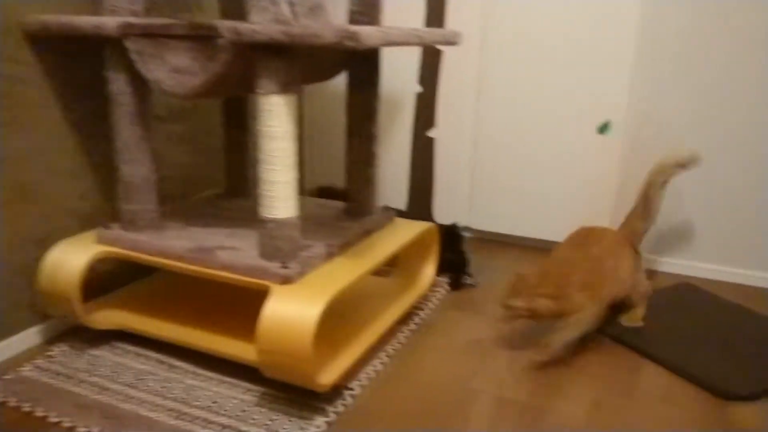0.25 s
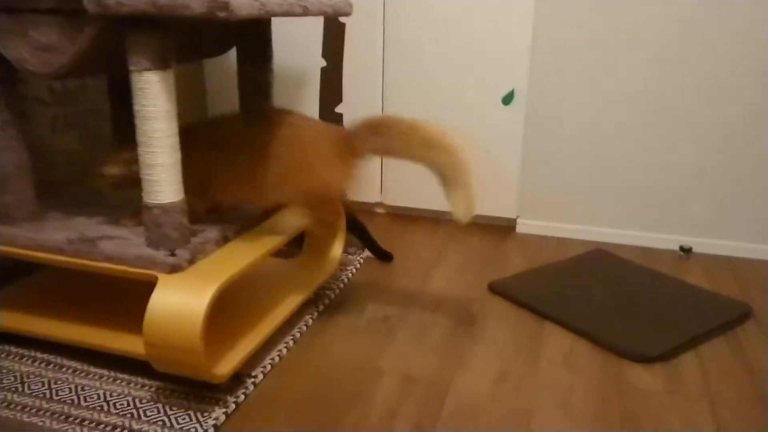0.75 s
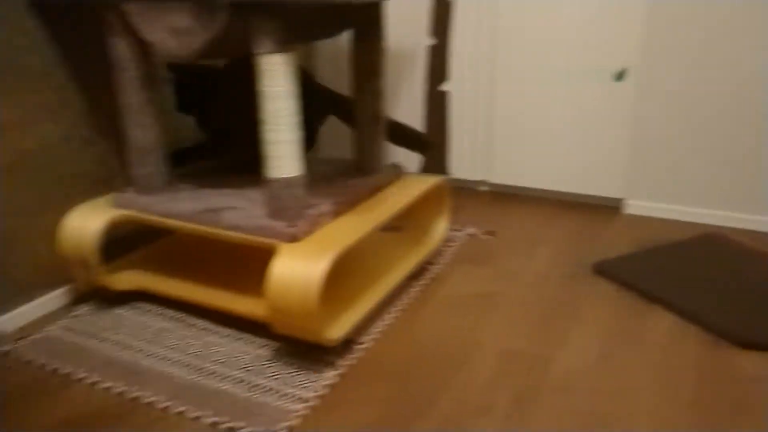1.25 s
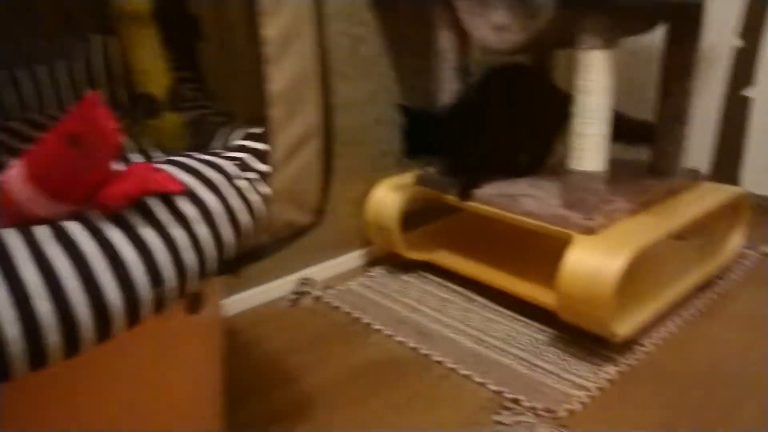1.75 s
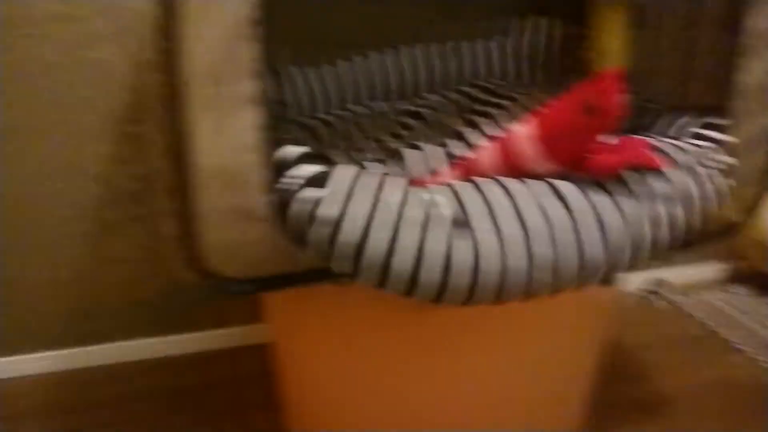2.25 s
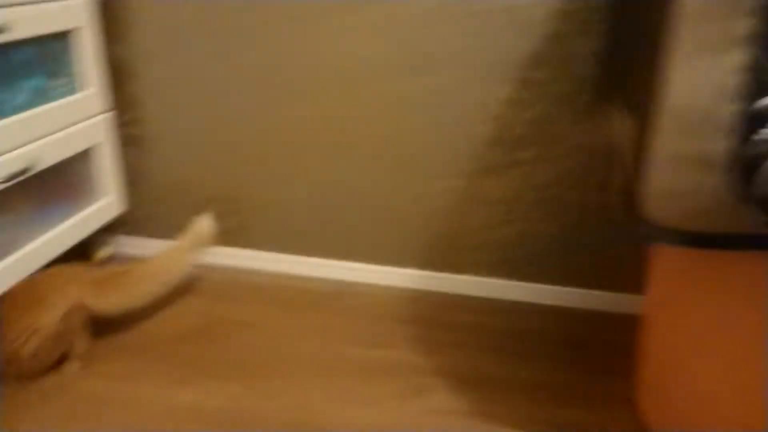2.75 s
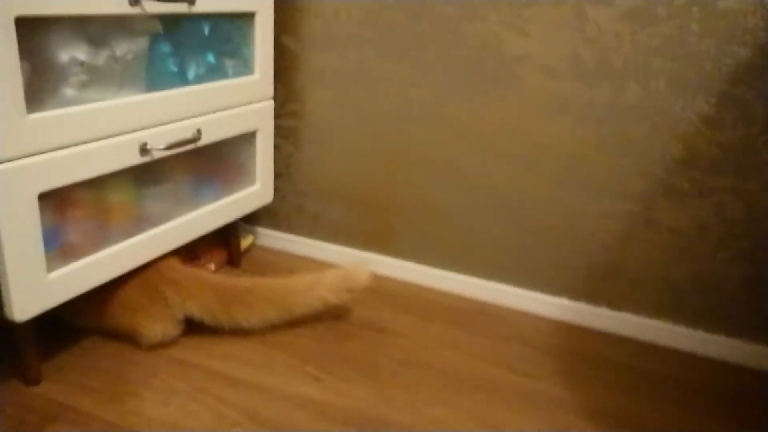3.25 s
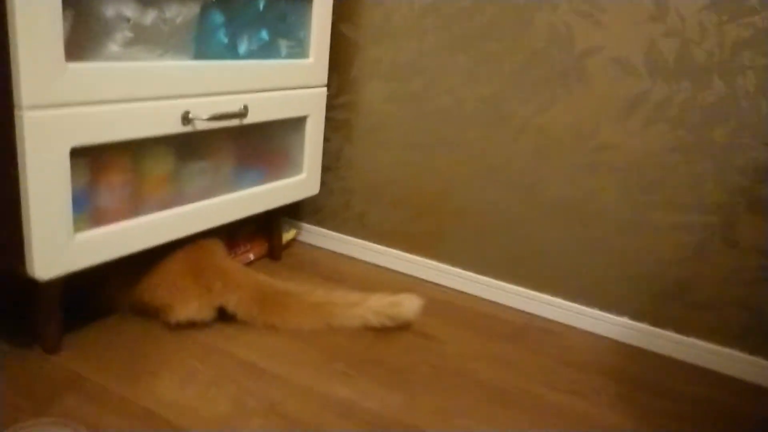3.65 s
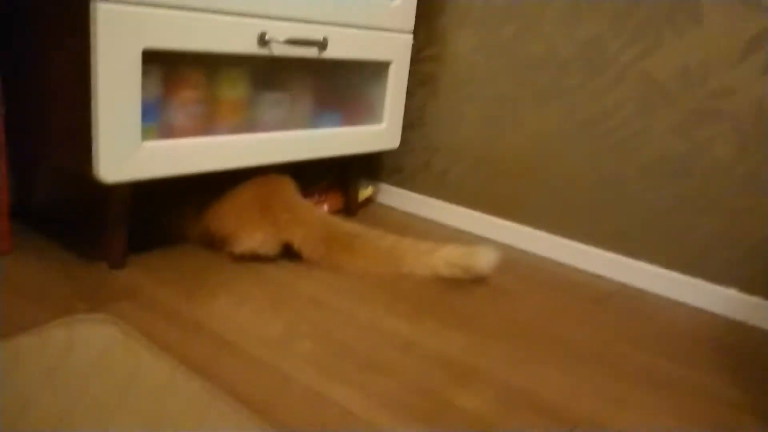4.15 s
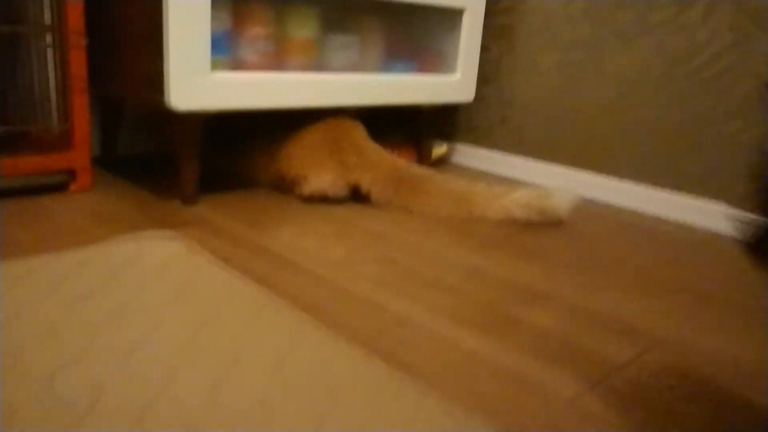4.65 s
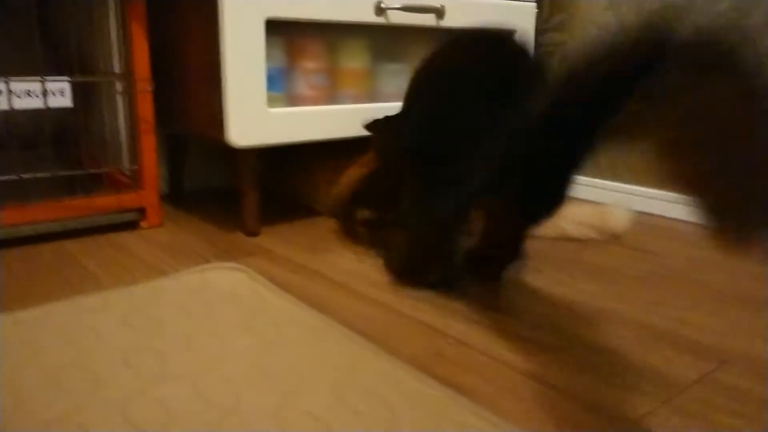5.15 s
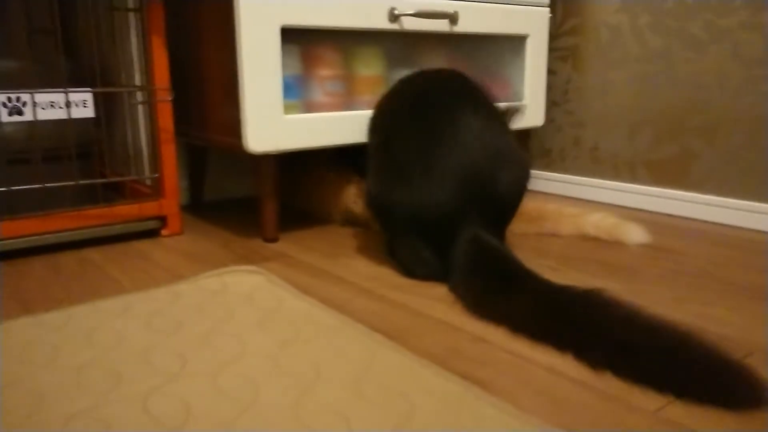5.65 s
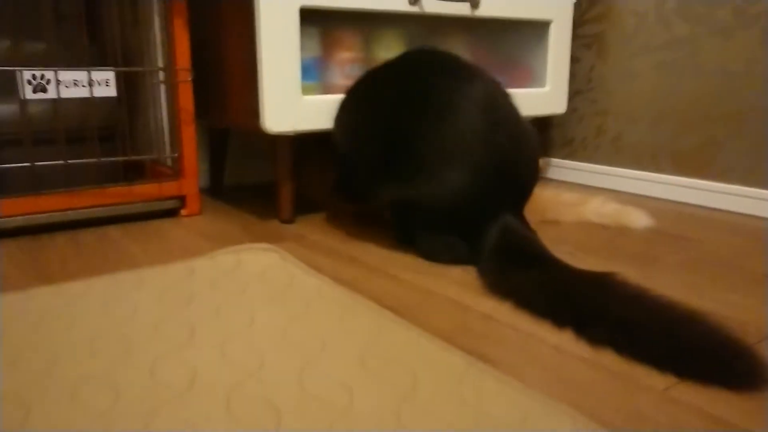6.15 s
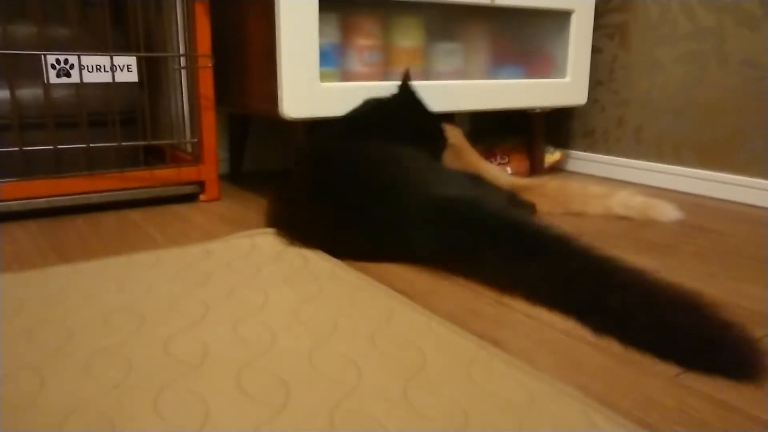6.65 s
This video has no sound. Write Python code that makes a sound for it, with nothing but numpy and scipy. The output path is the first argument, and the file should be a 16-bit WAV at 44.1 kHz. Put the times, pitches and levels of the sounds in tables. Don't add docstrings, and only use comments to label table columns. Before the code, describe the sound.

Close hand-held stereo microphone indoors: padded paws drum on floorboards and a hollow cat tree, with bright claw ticks, wooden knocks and scraping. The running fades and a quiet hush remains. A hard dry knock on the device breaks it, heaviest in the left, followed by small body taps. Then a scuffle of dull thumps, brushing fur and clicking claws dies away.

```python
import sys
import numpy as np
from scipy import signal
from scipy.fft import rfft, irfft, next_fast_len
from scipy.io import wavfile
from scipy.ndimage import uniform_filter1d

SR = 44100
rng = np.random.default_rng(int(sys.argv[2]) if len(sys.argv) > 2 else 0)


def bounce(signal):
    frames = np.transpose(np.atleast_2d(signal))
    limited = np.clip(frames, -1, 1)
    pcm = np.round(limited * 32767).astype(np.int16)
    wavfile.write(sys.argv[1], SR, pcm)


def invert_db(level):
    return 10 ** (np.asarray(level, dtype=float) / 20)


N = 304546
T = np.arange(SR * 2 // 5) / SR

# t/s, peak level/dB, board pitch f/Hz, other boards level/dB
CHASE_LANDINGS = [(0.178, -34, 73.7, -36), (0.244, -30.5, 524, -15), (0.554, -44, 315, 5.5),
                  (0.574, -39, 402, -28), (0.617, -53.5, 354, 9.5), (0.759, -51.5, 96, -15),
                  (0.915, -40.5, 230, 1), (0.942, -45.5, 258, 7.5), (1.173, -23.5, 350, -2.5),
                  (1.202, -35.5, 344, 12), (1.28, -28.5, 267, -0.5), (1.335, -26.5, 422, 3.5),
                  (1.389, -30, 293, 5.5), (1.412, -36.5, 267, 0), (1.465, -54, 288, -2),
                  (1.568, -41.5, 110, 2.5), (1.702, -43, 219, 3.5), (1.86, -57, 290, 7.5),
                  (1.916, -48.5, 97, 2.5), (2.03, -68, 229, 7), (2.139, -41.5, 112, -11),
                  (2.26, -51, 211, -2.5), (2.498, -54.5, 281, -20), (2.809, -52, 384, -5)]
# t/s, peak level/dB, board pitch f/Hz, other boards level/dB
SCUFFLE_LANDINGS = [(4.339, -48.5, 216, 10.5), (4.362, -39, 73.6, -36), (4.434, -38, 204, -18),
                    (4.463, -34.5, 201, -22), (4.487, -40, 213, -1.5), (4.536, -35, 305, -21),
                    (4.563, -30.5, 226, -3.5), (4.583, -35, 71, -36), (4.887, -42, 298, 4.5),
                    (5.066, -36, 174, 5), (5.153, -37, 169, -7.5), (5.247, -33, 97.3, -13),
                    (5.275, -47, 190, -19), (5.095, -45, 295, -4), (5.181, -44, 223, -6),
                    (4.91, -48, 296, 7), (5.6, -54.5, 220, 2), (6.139, -54.5, 199, -6),
                    (6.191, -59, 178, -11), (5.454, -21.5, 161, -13.5), (5.496, -32.5, 172.5, -10),
                    (5.535, -43.5, 193, -8), (5.949, -60.5, 223, 6), (6.068, -37.5, 169, -13.5),
                    (6.108, -45.5, 85.6, -17), (6.355, -54.5, 492, -16), (6.544, -67, 297, 13.5),
                    (6.649, -61, 250, 4), (6.812, -56, 89.5, -6.5)]
# f/Hz, width/Hz, level/dB
BOARD_MODES = [(79, 23, 1), (184, 63, 0.5), (271, 45.8, 6), (469, 447, -0.5), (560, 285, -3.5)]
# t/s, peak level/dB, brightest f/Hz,
# room level/dB
CLAW_TICKS = [(0.043, -28, 6700, 8), (0.2389, -26.5, 8700, 10), (0.2695, -26.5, 7700, 8),
              (0.56, -43, 7400, 8), (0.851, -54, 6100, 17), (0.969, -37.5, 7700, -3),
              (1.0964, -30, 1890, -2.5), (1.101, -31.5, 4200, -4), (5.3222, -38.5, 1700, 0.5),
              (.93, -47, 1420, 9), (5.7385, -58, 4600, -20), (1.0966, -33, 11000, -18),
              (.9692, -54, 12000, -8), (5.79, -51, 2100, 6), (4.7125, -49, 2600, -6),
              (4.563, -48, 2600, -12), (1.1715, -34, 5500, 2.5), (1.2002, -37, 3650, 0),
              (1.2855, -39.5, 5170, 2.5), (1.3285, -40.5, 5650, 8), (1.6993, -50, 7800, 0),
              (1.8905, -50.5, 7500, 9), (2.0232, -49, 4800, -2), (2.147, -44, 7000, 6),
              (2.198, -38, 5340, 1.5), (2.4951, -57.5, 2830, 7), (2.858, -41, 4330, 4),
              (2.9195, -40, 6300, -13.5), (4.343, -46, 9450, -10), (3.829, -63, 4500, -25),
              (3.924, -68, 7000, -25), (4.007, -67, 5200, -24), (5.324, -42, 4300, 2),
              (5.751, -47, 3500, 3), (4.464, -36.5, 11300, 4), (4.7896, -62, 7800, -6),
              (5.0664, -33.5, 2820, -7), (5.3217, -29.5, 6500, -7.5), (5.7486, -32.5, 6800, -7),
              (5.9732, -43, 8800, -20.5), (6.415, -55.5, 4970, -18), (6.82, -62, 4000, -16)]
# t/s, peak level/dB, room level/dB
POST_CATCHES = [(1.1727, -42, -9), (1.2023, -38, -5), (1.285, -52, -2), (1.328, -42.5, -1),
                (1.346, -49.5, -9), (1.355, -52.5, 9)]
# f/Hz, width/Hz, level/dB
POST_MODES = [(3880, 360, -7.5), (6520, 780, 2.5), (8870, 1100, 4)]
# t/s, peak level/dB, pitch f/Hz, room level/dB
WOOD_KNOCKS = [(0.041, -45.5, 840, -0.5), (0.24, -44.5, 534, 6), (0.554, -60, 565, 9.5),
               (0.912, -44, 666, 4), (0.969, -51.5, 1700, 5.5), (1.095, -43, 840, 2),
               (1.171, -30.5, 710, -8.5), (1.202, -41, 720, -1.5), (1.332, -43, 746, 3.5),
               (4.344, -49.5, 640, -6), (4.363, -48.5, 990, -14), (4.594, -40.5, 910, -30),
               (2.933, -55.5, 1950, 2), (3.0, -65.5, 1750, 5), (3.06, -63, 1295, 4), (4.563, -60, 690, -12),
               (4.611, -47, 607, -34), (4.89, -52.5, 820, -7), (5.066, -46, 800, -0.5),
               (5.322, -45, 940, -4), (5.3225, -45.5, 2000, -7), (1.037, -43.5, 1030, -1),
               (1.264, -42, 620, -3), (5.142, -56, 920, -3), (5.213, -60, 940, -6), (5.256, -57, 910, -7),
               (5.292, -55.5, 900, -1), (5.042, -70, 855, 3), (5.453, -51, 870, 1.5),
               (5.566, -49.5, 725, -1.5), (5.842, -49.5, 364, -29), (1.3325, -37, 560, -1),
               (1.178, -34, 520, -1), (5.7488, -45.5, 1220, -4.5), (5.774, -46, 1280, -3),
               (6.004, -59.5, 1020, -2), (6.356, -69, 770, 7.5), (6.822, -65, 1030, -21),
               (1.715, -56, 1880, 0.5), (1.3335, -38, 980, 0), (1.342, -51, 865, -1), (1.352, -49, 1450, 0),
               (4.385, -63, 600, -10), (4.436, -56, 650, -16), (4.49, -69, 604, -12),
               (4.537, -56, 600, -19)]
# t/s, peak level/dB, pitch
# f/Hz, # room level/dB
NARROW_PINGS = [(.269, -42, 5800, 7), (.285, -42, 7660, 6), (.556, -49, 7960, -9), (.865, -54, 5280, 8.5),
                (1.1715, -32.5, 2100, -7.5), (1.174, -39, 3930, -8), (1.203, -31, 1910, -9),
                (1.204, -39.5, 3890, -1), (.969, -51, 8600, -14), (1.288, -47, 6400, -2),
                (1.333, -27.5, 1256, -6.5), (2.861, -56, 5200, 0), (2.867, -44, 5070, -8),
                (2.9195, -41, 1900, -15), (5.3225, -35.5, 1515, -10.5), (5.7488, -39.5, 930, -10),
                (5.7495, -46.5, 1930, -3), (5.7495, -53.5, 4250, -4), (5.774, -36.5, 936, -7),
                (5.775, -44, 1900, -9), (4.464, -52, 2040, -15), (2.198, -47.5, 5480, -1)]
# t/s, bustle level/dB, weight level/dB
MOTION_LEVELS = [(0, -54, -56), (.4, -55.5, -50.5), (.54, -61.5, -69.5), (.9, -63, -65.5), (1.2, -58, -56),
                 (1.4, -56.5, -54), (1.75, -73, -73), (2.3, -69.5, -63.5), (2.62, -76.5, -75),
                 (2.76, -63, -86), (3.15, -78, -95.5), (4.29, -78, -63.5), (4.4, -66.5, -61.5),
                 (4.95, -71.5, -58), (5.27, -75, -57), (5.65, -73, -62), (6.3, -77.5, -69.5),
                 (6.9, -75.5, -71)]
# peak t/s, peak level/dB, rise/s, fall/s
FUR_STROKES = [(.06, -54, 0.041, 0.024), (.3, -47, 0.036, 0.046), (.87, -66, 0.032, 0.079),
               (1.05, -94, 0.16, 0.024), (1.25, -60, 0.065, 0.015), (1.62, -68, 0.026, 0.038),
               (1.72, -70.5, 0.027, 0.037), (1.92, -67.5, 0.034, 0.12), (2.11, -71, 0.025, 0.04),
               (2.21, -57.5, 0.027, .06), (2.52, -103, 0.022, 0.024), (2.72, -75.5, 0.087, 0.038),
               (2.95, -81, 0.038, 0.16), (3.189, -76, 0.081, 0.065), (3.967, -88, .01, 0.011),
               (4.2, -93, .015, .015), (4.325, -82, 0.018, 0.0079), (4.355, -68, .008, 0.017),
               (4.501, -57, 0.027, 0.048), (4.575, -60.5, .008, .012), (4.63, -64, 0.015, 0.056),
               (4.809, -59.5, 0.018, 0.0077), (4.89, -60, 0.056, 0.05), (5.1, -70.5, 0.036, 0.08),
               (5.24, -54, 0.087, 0.11), (5.8, -77, .03, 0.24), (6.4, -81.5, 0.039, 0.047),
               (6.6, -72, 0.062, 0.18), (6.85, -77.5, 0.039, 0.14)]
# peak t/s, peak level/dB, rise/s, fall/s
CLAW_RAKES = [(.6, -64.5, 0.038, 0.1), (.8, -73, .04, 0.039), (.95, -56.5, 0.028, 0.053),
              (4.52, -77, 0.01, .02), (1.04, -54.5, 0.13, 0.14), (1.36, -63, 0.015, 0.16),
              (3.05, -75.5, 0.17, 0.12), (4.64, -59, 0.035, 0.059), (5.34, -67, 0.012, 0.028),
              (5.62, -99, 0.04, 0.042), (6.55, -71, 0.059, 0.084), (6.39, -76, 0.014, 0.039)]
# peak t/s, peak level/dB, rise/s, fall/s
BELLY_RUBS = [(4.38, -61, 0.029, .05), (4.5, -68, .04, 0.045), (1.35, -45.5, 0.013, 0.068),
              (1.22, -50, .02, .04), (.255, -51.5, 0.0089, 0.026), (.57, -58, 0.0086, 0.053),
              (2.94, -70, 0.022, 0.053), (2.7, -70, 0.063, 0.09), (6.6, -76, 0.04, 0.063),
              (2.52, -79, 0.05, 0.023), (1.994, -68, 0.079, 0.091)]
# f/Hz, level/dB per Hz
FAR_FUR = [(1470, -50), (2500, -11), (4600, -8.5), (5400, -8), (8040, -9), (9950, -11.5), (15500, -14.5),
           (16500, -46)]
# f/Hz, level/dB per Hz
NEAR_FUR = [(1470, -54), (2500, -11.5), (4410, -6), (8500, -3), (15000, -5.5), (16100, -11), (16500, -29)]
# f/Hz, level/dB per Hz
PAD_SCUFF = [(500, -8.5), (1000, -5.5), (1800, -6.5), (2650, -8.5), (3300, -18), (9000, -38)]
# f/Hz, level/dB per Hz
BELLY_SHUFFLE = [(150, -37), (280, -2.5), (500, 0.5), (850, -5), (1500, -24), (4000, -54)]
# f/Hz, t60/s, left level/dB, right level/dB, polarity at the right port
HARD_MODES = [(88, 0.063, -42.5, -35, 0.79), (150, 0.016, -37, -28, 0.79), (241, 0.013, -20, -23.5, -0.26),
              (520, 0.004, -8, -27.5, -0.824), (866, 0.0062, -14.5, -40, 0.96),
              (1222, 0.003, -37, -38, -0.16), (1467, 0.0068, -22, -17, 0.12),
              (2550, 0.0054, -29, -38.5, 0.59)]
# t/s, level/dB
FINGER_SLIP = [(3.452, -86.5), (3.458, -58), (3.466, -51.5), (3.472, -66), (3.482, -42), (3.494, -58),
               (3.503, -78), (3.54, -100)]
# t/s, peak level/dB, body pitch f/Hz, nail click level/dB, L-R level/dB
LIGHT_TAPS = [(3.825, -51.5, 1280, -21, -21.5), (3.848, -51, 646, -38, 18), (3.92, -38.5, 493, -34, 22),
              (3.955, -49.5, 634, -26, 20), (4.004, -57, 556, -19, 20), (4.047, -52, 452, -32, 20),
              (4.106, -36, 1900, -48, -11), (4.15, -18, 590, -26.5, 12.5), (4.1475, -44, 560, -15, 24),
              (4.17, -41.5, 490, -49, 21), (4.187, -48.5, 424, -27, 25), (4.247, -48, 303, -44.5, 26),
              (4.282, -50.5, 640, -43, -17), (4.295, -37, 350, -30, 17), (4.59, -27.5, 385, -15, 29.5),
              (4.609, -30, 400, -4, -6), (4.709, -35.5, 420, -17, 12), (4.764, -59, 358, -4, 5),
              (4.807, -29.5, 413, -35, 10), (4.856, -25, 393, -19, 14.5), (5.737, -64, 918, -8, 5)]
# t/s, left port lag/ms, L-R level/dB
CAT_BEARING = [(0, -0.0077, -5.5), (.7, -0.07, -4), (1.2, -0.35, -2.5), (2.2, -0.33, -5),
               (2.8, -0.16, -5.5), (4.3, .35, -5.5), (5.2, 0.072, -2.5), (6.9, 0.34, -13)]
# f/Hz, t60/s
ROOM_DECAY = [(100, 0.23), (1000, 0.45), (6000, 0.38), (15000, 0.21)]
# f/Hz, likeness [1 = same]
PORT_LIKENESS = [(60, 0.79), (250, 0.86), (600, 0.15), (1200, 0.033), (10000, 0.0081)]
# f/Hz, level/dB per Hz
HUSH_COLOUR = [(25, -24), (60, 8), (95, 6.5), (150, -9.5), (300, -30.5), (600, -59), (1000, -17),
               (2000, -24), (3500, -32), (6500, -49), (12800, -35)]

RING_S, RING_FALLS = 0.099, 0.97
OTHERS_LAST, PAD_CYCLES = 1.65, 0.23
RUG_S, RUG_DAMPS = (4.4, 5), 0.36
PRESSED_S, PRESS_DAMPS = (5.44, 5.47), 0.57
TREE_S, TREE_LIFTS = (1.1, 1.5), 1.88
ROOM_LOW_HZ = 350
PAW_PAN_DB, CLAW_PAN_DB, KNOCK_PAN_DB, PING_PAN_DB = 0, 0, -1.5, -2.5
UPPER, UPPER_DB = 1.75, -11
CLOSE_S = (4.4, 5.45)
FUR_DB, FUR_GROWS = -76.5, 1
SCUFF_DB, STROKE_SCUFF_DB = -4.5, -6.5
SLIDES_PAN_DB = -0.46
HARD_S, FAR_PORT_S = 3.4619, 0.0007
NAIL_HZ = 2150
STILL_S, STILL_DB, TREMOR_HZ = (2.38, 2.78), -16, 160
HUSH_DB = -67


def paws(tails):
    out = np.zeros((2, N + SR))
    for s, db, hz, others_db in CHASE_LANDINGS + SCUFFLE_LANDINGS:
        t60 = RING_S * (200 / hz) ** RING_FALLS
        if RUG_S[0] < s < RUG_S[1]:
            t60 *= RUG_DAMPS
        elif PRESSED_S[0] < s < PRESSED_S[1]:
            t60 *= PRESS_DAMPS
        low_hz = 0.36 * hz * (TREE_LIFTS if TREE_S[0] < s < TREE_S[1] else 1)
        shaken = lambda f: boards(f) * (1j * f / (low_hz + 1j * f)) ** 3
        shake = rng.standard_normal(len(T)) * invert_db(-60 * T / (OTHERS_LAST * t60))
        others = filtered(shake, shaken)
        struck = ring(hz, t60, PAD_CYCLES / hz)
        thump = filtered(struck + invert_db(others_db) * others / np.abs(others).max(), soft(730))
        to_room = filtered(thump, lambda f: 1j * f / (ROOM_LOW_HZ + 1j * f))
        heard = placed(thump, s, PAW_PAN_DB) + invert_db(0.5) * room(to_room, tails)
        add(out, s + 0.0011, invert_db(db + 1.5) * heard)
    return out[:, :N]


def boards(f):
    return sum((-1) ** k * invert_db(db) * resonance(c, w)(f) for k, (c, w, db) in enumerate(BOARD_MODES))


def soft(hz):
    return lambda f: (hz / (hz + 1j * f)) ** 3


def claws(tails):
    return contacts(CLAW_TICKS, tails, t60=0.015, gain_db=-1.0, pan_db=CLAW_PAN_DB,
                    width=lambda hz: 1.57 * hz, upper_db=None)


def catches(tails):
    out = np.zeros((2, N + SR))
    for s, db, room_db in POST_CATCHES:
        x = sum(invert_db(mode_db) * puff(hz, width_hz, 0.016) for hz, width_hz, mode_db in POST_MODES)
        add(out, s, invert_db(db) * (placed(x, s, 0) + invert_db(room_db - 2.5) * room(x, tails)))
    return out[:, :N]


def knocks(tails):
    return contacts(WOOD_KNOCKS, tails, t60=0.023, gain_db=4.5, pan_db=KNOCK_PAN_DB,
                    width=lambda hz: 300 + 0.2 * hz, upper_db=UPPER_DB)


def pings(tails):
    return contacts(NARROW_PINGS, tails, t60=0.018, gain_db=0.5, pan_db=PING_PAN_DB,
                    width=lambda hz: 160 + 0.12 * hz, upper_db=None)


def contacts(table, tails, t60, gain_db, pan_db, width, upper_db):
    out = np.zeros((2, N + SR))
    for s, db, hz, room_db in table:
        x = puff(hz, width(hz), t60)
        if upper_db is not None:
            x = x + invert_db(upper_db) * puff(UPPER * hz, width(hz) * UPPER, t60)
        answer = invert_db(room_db + 4.0) * sides(pan_db) * room(x, tails)
        add(out, s, invert_db(db + gain_db) * (placed(x, s, pan_db) + answer))
    return out[:, :N]


def fur():
    bustle_db = curves(MOTION_LEVELS)[0]
    close = np.abs(np.arange(N) / SR - np.mean(CLOSE_S)) < np.ptp(CLOSE_S) / 2
    far = rush(lambda f: invert_db(along(FAR_FUR, f)), patchy_db=0.3, grain_db=2.2)
    near = rush(lambda f: invert_db(along(NEAR_FUR, f)), patchy_db=0.4, grain_db=1.1)
    level = invert_db(FUR_DB + FUR_GROWS * (bustle_db + 64.0)) + strokes(FUR_STROKES)
    return level * np.where(close, near, far)


def scuffs():
    bustle_db = curves(MOTION_LEVELS)[0]
    pads = rush(lambda f: invert_db(along(PAD_SCUFF, f)), patchy_db=1.2, grain_db=2.0)
    stroked = invert_db(STROKE_SCUFF_DB) * strokes(FUR_STROKES)
    return (invert_db(bustle_db + SCUFF_DB) + stroked + strokes(CLAW_RAKES)) * pads


def shuffles():
    bustle_db = curves(MOTION_LEVELS)[0]
    bellies = rush(lambda f: invert_db(along(BELLY_SHUFFLE, f)), patchy_db=2, grain_db=2.0)
    return (invert_db(bustle_db) + strokes(BELLY_RUBS)) * bellies


def rumble():
    weight_db = curves(MOTION_LEVELS)[1]
    return invert_db(weight_db) * rush(lambda f: boards(f) * soft(220)(f), patchy_db=1.5, grain_db=3.0)


def strokes(table):
    t = np.arange(N) / SR
    total = np.zeros(N)
    for s, db, rise, fall in table:
        span = np.where(t < s, max(rise, 0.005), max(fall, 0.005))
        total += invert_db(db) * np.exp(-((t - s) / span) ** 2)
    return total


def hard_tap(tails):
    out = np.zeros((2, N + SR))
    for hz, t60, left_db, right_db, polarity in HARD_MODES:
        add(out[:1], HARD_S, -invert_db(left_db + 13.0) * ring(hz, t60, 0.001)[None])
        far_ring = ring(hz, t60, 0.00025)[None]
        add(out[1:], HARD_S + FAR_PORT_S, -polarity * invert_db(right_db + 13.0) * far_ring)
    crack = [puff(5540, 3600, 0.0024) + 0.26 * puff(8300, 1900, 0.0016) + 0.4 * puff(17000, 4500, 0.0019)
             for port in "LR"]
    add(out, HARD_S + 0.00041, invert_db([[-14], [-21]]) * crack)
    add(out, HARD_S, invert_db(-44.5) * room(crack[0], tails))
    skin = [(300, -6), (2500, -6), (6000, -7), (10500, -17), (14500, -1)]  # f/Hz, level/dB per Hz
    slip = rush(lambda f: invert_db(along(skin, f)), patchy_db=-2, grain_db=1.5)
    return out[:, :N] + invert_db(curves(FINGER_SLIP)[0]) * sides(17) * slip


def taps():
    out = np.zeros((2, N + SR))
    for s, db, hz, click_db, pan_db in LIGHT_TAPS:
        body = np.array([ring(hz, 3.1 / hz, 0.00024), ring(1.04 * hz, 11.0 / hz, 0.00037)])
        body = body + invert_db(5.5) * ring(2.3 * hz, 2.6 / hz, 0.0033)
        nail = np.array([puff(NAIL_HZ, 1.29 * NAIL_HZ, 0.013) for port in "LR"])
        click = invert_db(click_db + 10.0) * nail
        push = 0.5 * min(1, 600 / hz) * ring(204, 0.027, 0.0005)
        add(out, s + 0.0036, invert_db(db - 6.0) * (body - push + click) * sides(pan_db))
    return out[:, :N]


def hush():
    x = rush(lambda f: invert_db(along(HUSH_COLOUR, f)) * (f < 12900), patchy_db=-0.5, grain_db=2.0)
    tremor = filtered(x, lambda f: 1 / (1 + (f / TREMOR_HZ) ** 6))
    t = np.arange(N) / SR
    still = uniform_filter1d(1. * (t > STILL_S[0]) * (t < STILL_S[1]), size=1500)
    return invert_db(HUSH_DB) * sides(-7.5) * (x - tremor * still * (1 - invert_db(STILL_DB)))


def room_tails(count):
    hz, t, z = signal.stft(rng.standard_normal((count, 2, len(T))), SR, nperseg=256)
    decay = invert_db(-60 * t / along(ROOM_DECAY, hz)[:, None])
    tails = signal.istft(z * decay, SR, nperseg=256)[1][..., :len(T)]
    tails = np.array([blend(pair * (1 - np.exp(-T / 0.00059))) for pair in tails])
    return tails / np.linalg.norm(tails[:, :1], axis=2, keepdims=True)


def room(x, tails):
    return signal.fftconvolve(x[None], tails[rng.integers(len(tails))], axes=1)[:, :len(T)]


def placed(x, s, pan_db):
    at, lag_ms, turn_db = np.transpose(CAT_BEARING)
    half = round(np.interp(s, at, lag_ms) * SR / 2000)
    ports = np.array([np.roll(x, 12 + half), np.roll(x, 12 - half)])
    return ports * sides(pan_db + np.interp(s, at, turn_db))


def ring(hz, t60, attack):
    return np.sin(2 * np.pi * hz * T) * invert_db(-60 * T / t60) * (1 - np.exp(-T / attack))


def puff(hz, width_hz, t60):
    x = 0.12 * rng.standard_normal(SR // 20) * invert_db(-60 * T[:SR // 20] / t60)
    x[0] = 1
    x = filtered(x, lambda f: resonance(hz, width_hz)(f) ** 2)
    return np.pad(x / np.abs(x).max(), (0, len(T) - len(x)))


def rush(colour, patchy_db, grain_db):
    z = signal.stft(rng.standard_normal((2, N + 512)), nperseg=512)[2]
    field = uniform_filter1d(rng.standard_normal(z.shape[1:]), size=6, axis=0)
    field = uniform_filter1d(field, size=8, axis=1)
    pair = signal.istft(z * invert_db(patchy_db * unit(field)), nperseg=512)[1][:, :N]
    grain = invert_db(grain_db * unit(uniform_filter1d(rng.standard_normal(N), size=150)))
    return unit(filtered(blend(pair * grain), colour))


def blend(pair):
    turn = lambda hz: np.arccos(np.clip(along(PORT_LIKENESS, hz), -1, 1)) / 2
    mid, side = filtered(pair, lambda hz: np.array([np.cos(turn(hz)), np.sin(turn(hz))]))
    return np.array([mid + side, mid - side])


def resonance(hz, width_hz):
    return lambda f: 1j * f * width_hz / (hz * hz - f * f + 1j * f * width_hz + 1e-9)


def filtered(x, response):
    n = x.shape[-1]
    m = next_fast_len(n + 4096)
    return irfft(rfft(x, m) * response(np.fft.rfftfreq(m, 1 / SR)), m)[..., :n]


def unit(x):
    return x / np.sqrt(np.mean(x ** 2) + 1e-20)


def along(points, hz):
    f, v = np.transpose(points)
    return np.interp(np.log(hz + 1), np.log(f + 1), v)


def curves(rows):
    s, *cols = np.transpose(rows)
    return [np.interp(np.arange(N) / SR, s, c) for c in cols]


def sides(pan_db):
    return invert_db([pan_db / 2, -pan_db / 2]).reshape(2, -1)


def add(out, s, x):
    start = round(s * SR)
    out[:, start:start + x.shape[1]] += x


def scene():
    tails = room_tails(count=12)
    strikes = paws(tails) + claws(tails) + catches(tails) + knocks(tails) + pings(tails)
    slides = (fur() + scuffs() + shuffles() + rumble()) * sides(SLIDES_PAN_DB)
    handling = hard_tap(tails) + taps()
    return strikes + slides + handling + hush()


def roll_off(x):
    return signal.sosfilt(signal.butter(12, 16760, fs=SR, output="sos"), x)


def record(dry):
    ports = lambda f: 1 + 0.028 * resonance(5400, 1100)(f) + 0.38 * resonance(8100, 1500)(f)
    bass_cut = lambda f: (1j * f / (42 + 1j * f)) ** 5
    top_cut = lambda f: 1 / (1 + (f / 16300) ** 60)
    mix = filtered(dry, lambda f: ports(f) * bass_cut(f) * top_cut(f))
    return roll_off(mix)


dry = scene()
out = record(dry)
bounce(out)
```